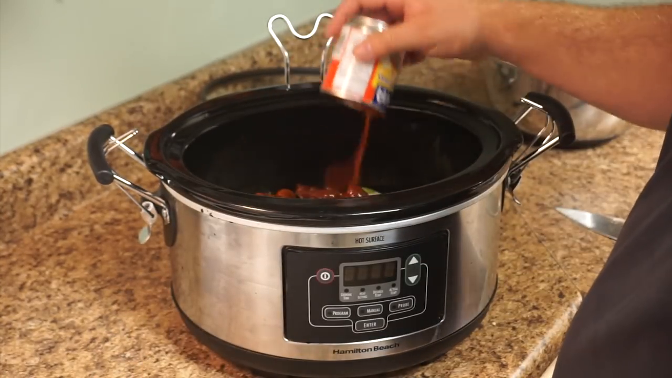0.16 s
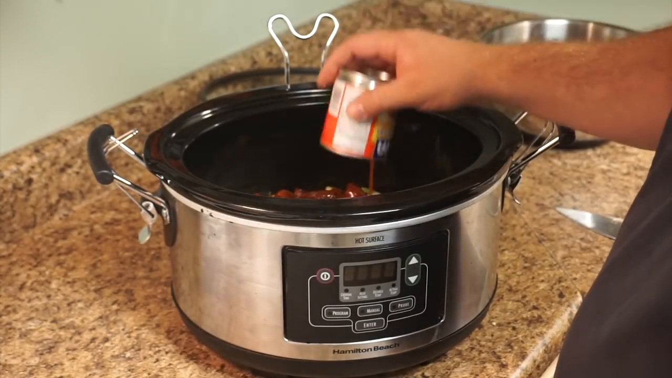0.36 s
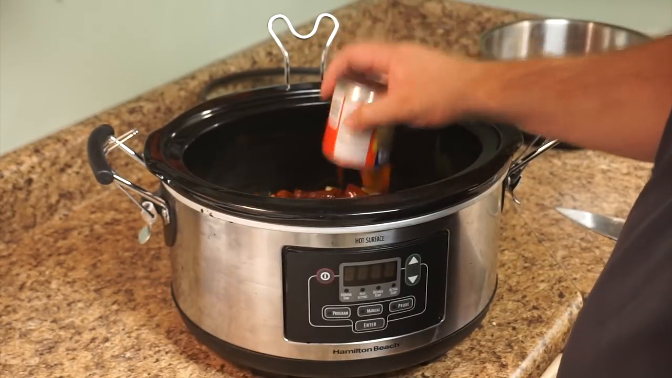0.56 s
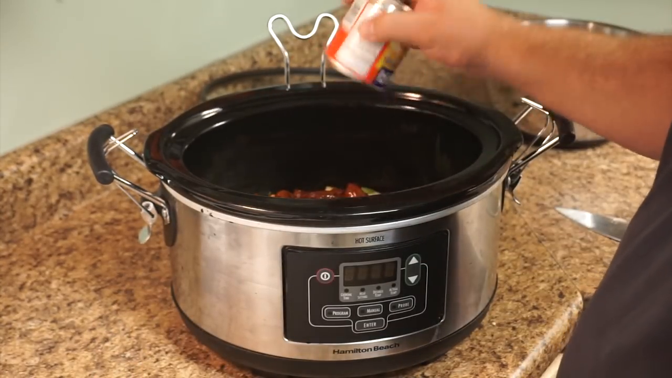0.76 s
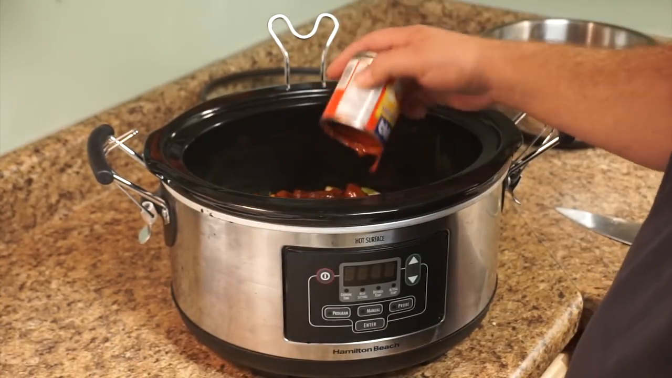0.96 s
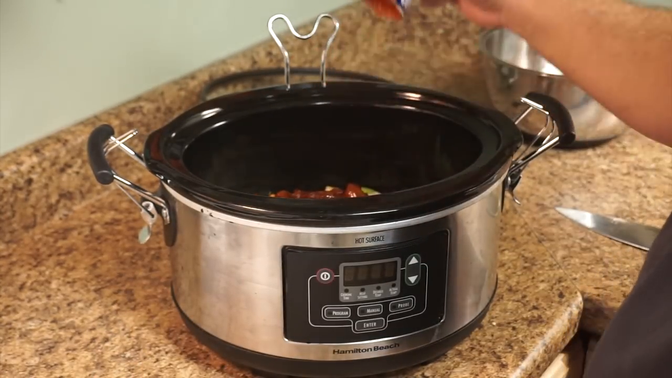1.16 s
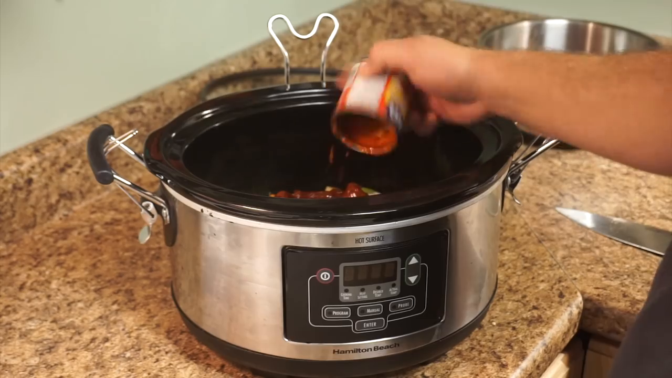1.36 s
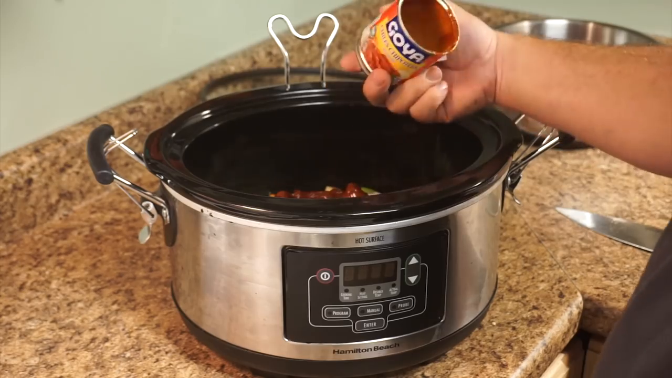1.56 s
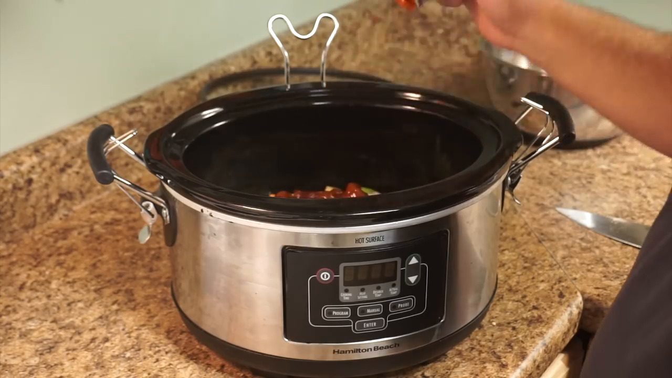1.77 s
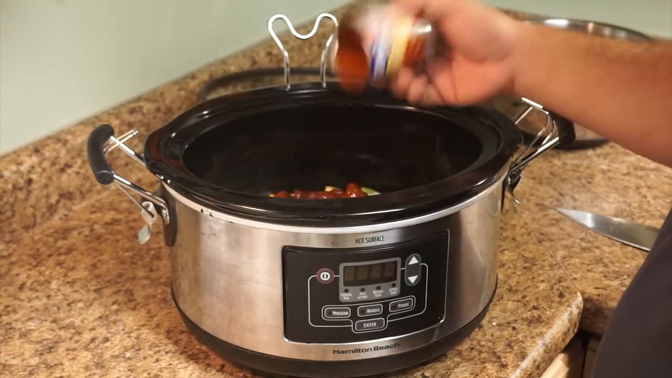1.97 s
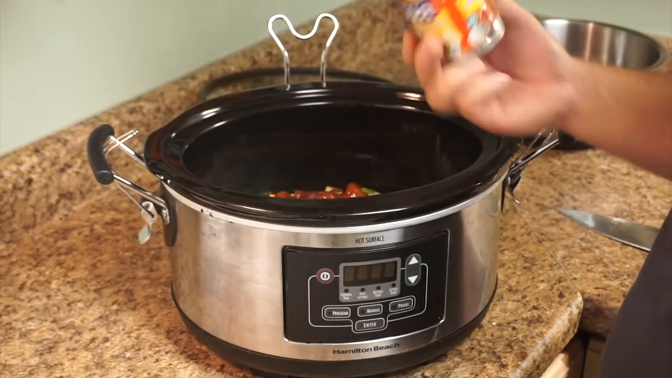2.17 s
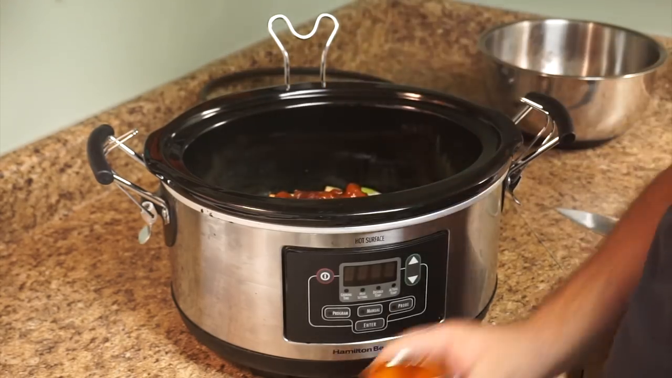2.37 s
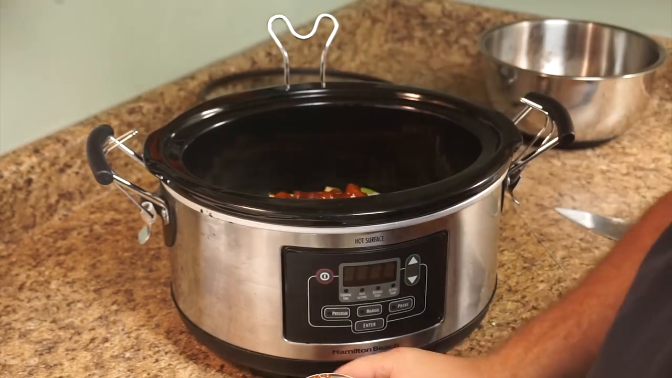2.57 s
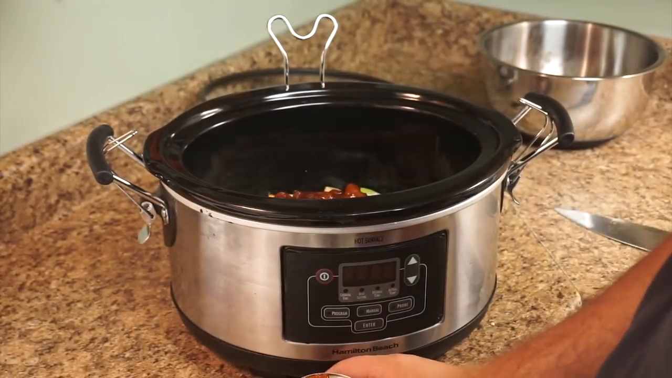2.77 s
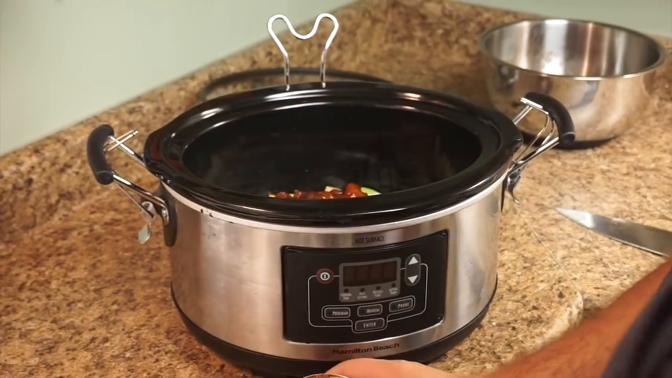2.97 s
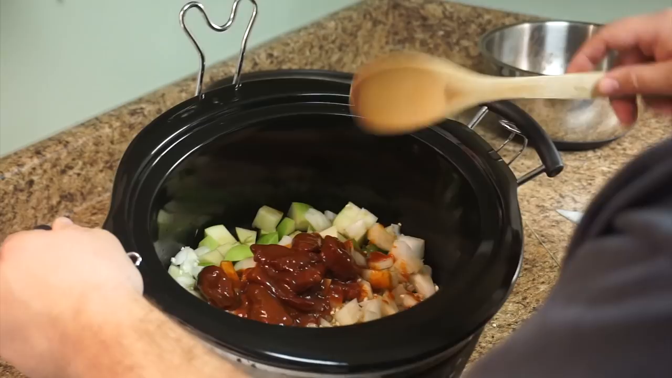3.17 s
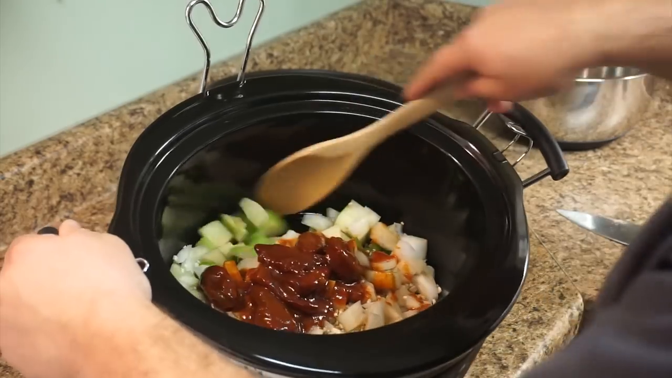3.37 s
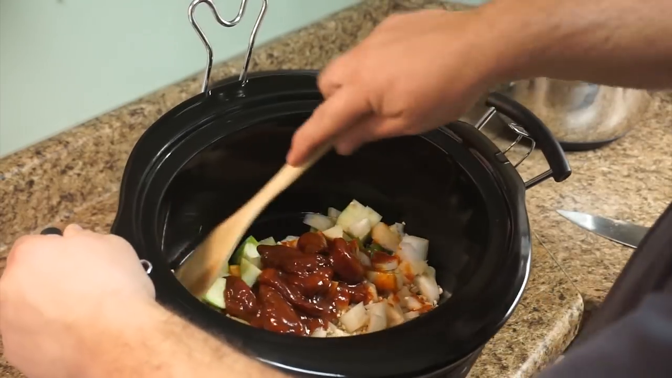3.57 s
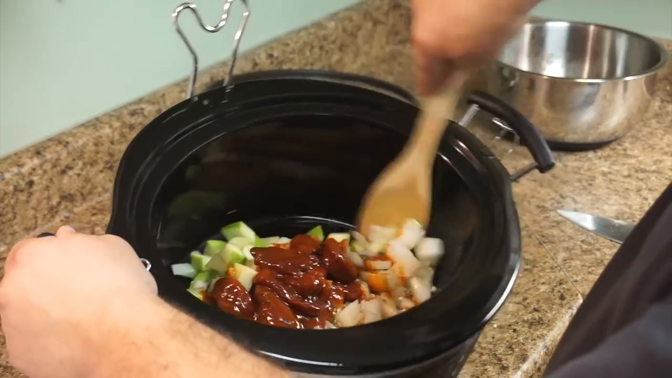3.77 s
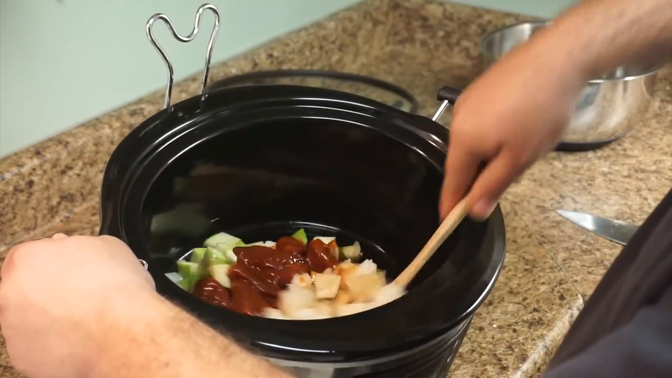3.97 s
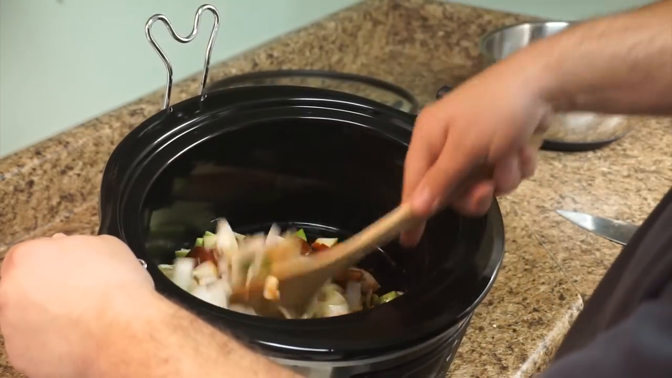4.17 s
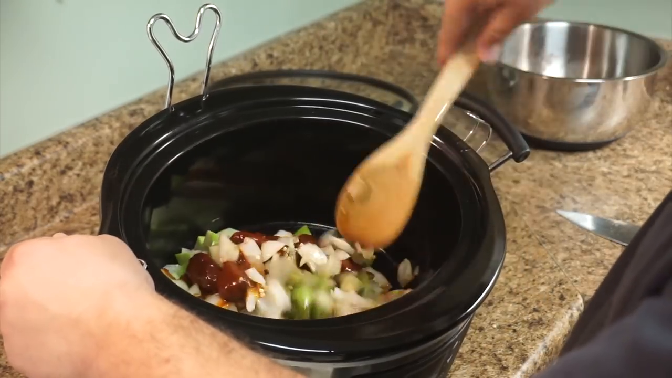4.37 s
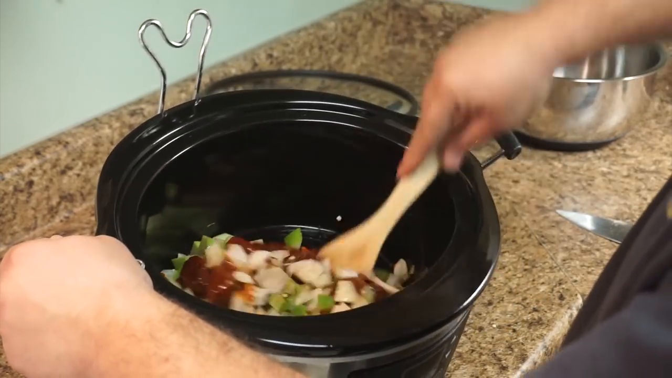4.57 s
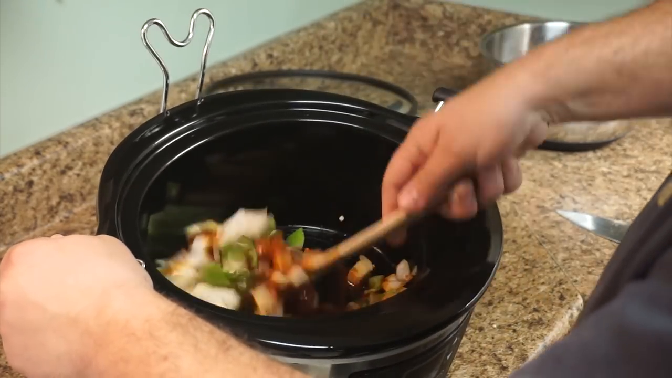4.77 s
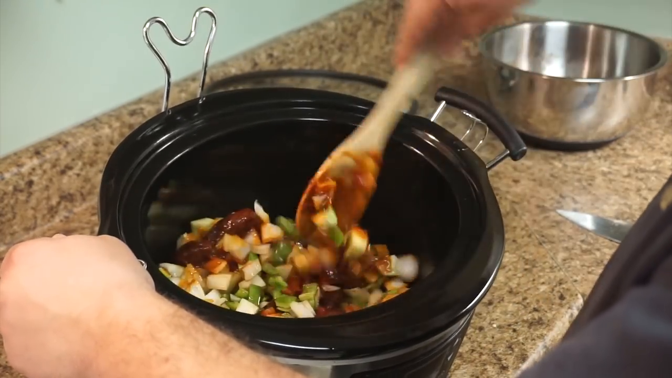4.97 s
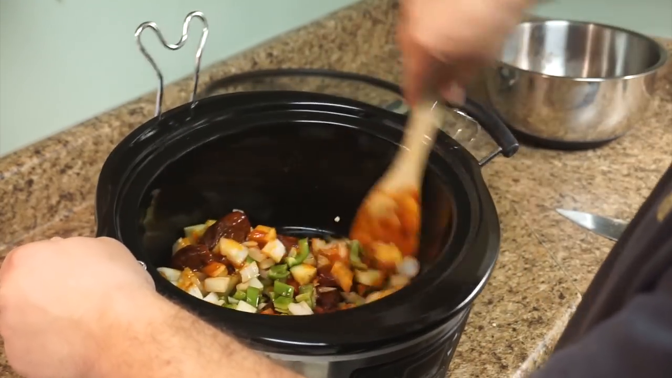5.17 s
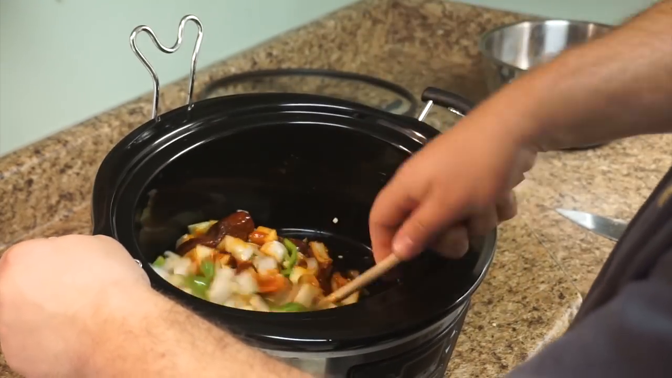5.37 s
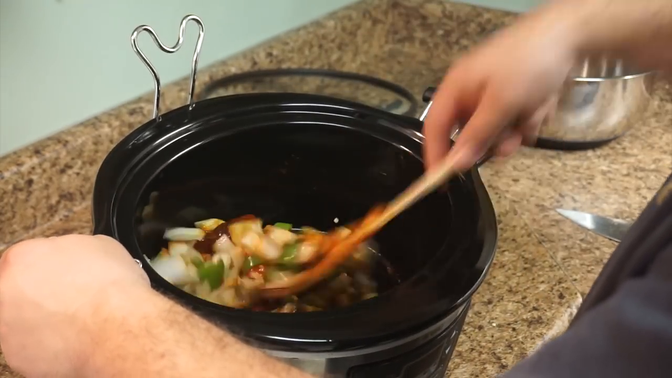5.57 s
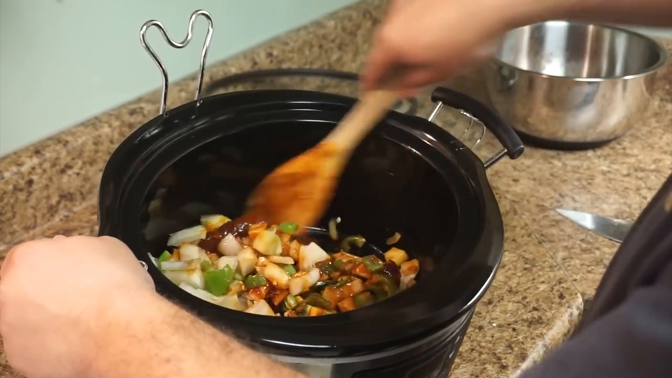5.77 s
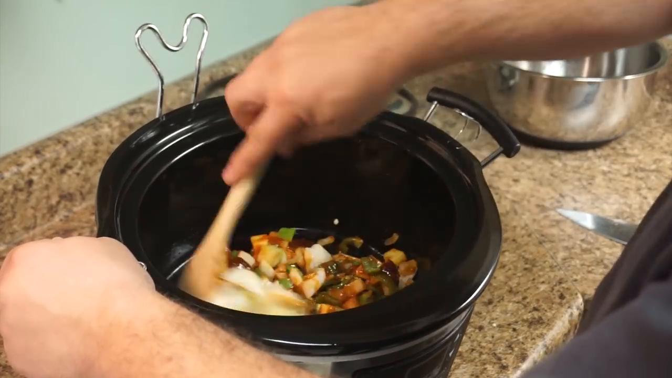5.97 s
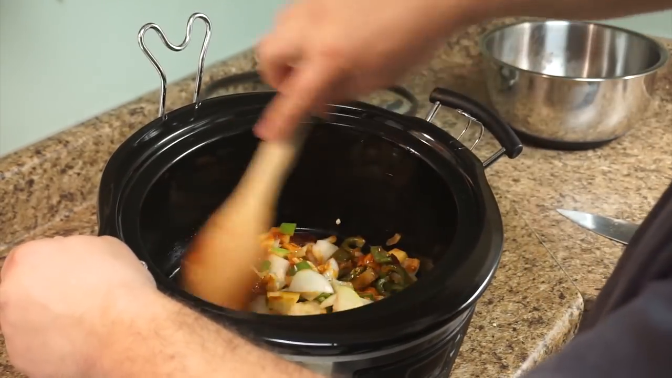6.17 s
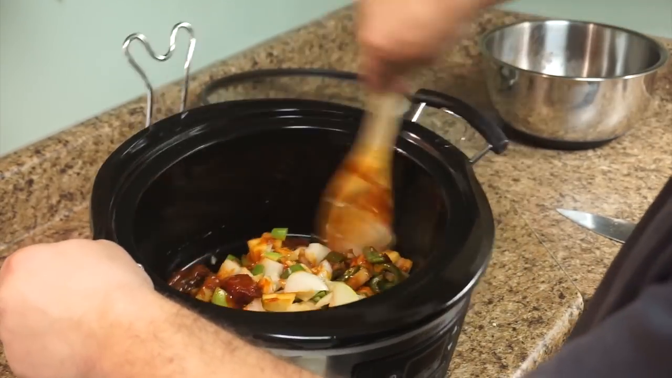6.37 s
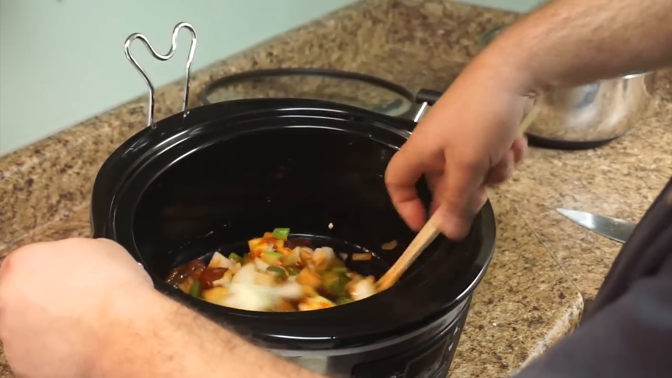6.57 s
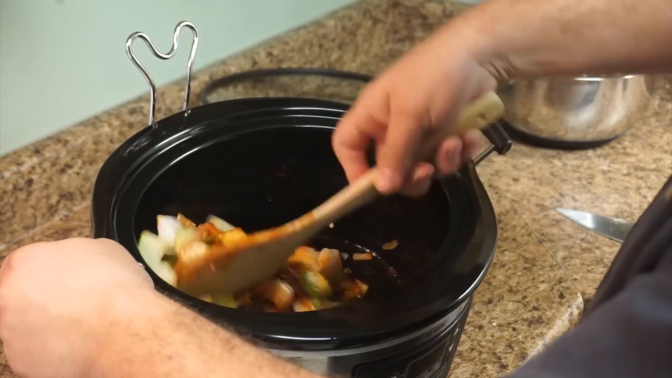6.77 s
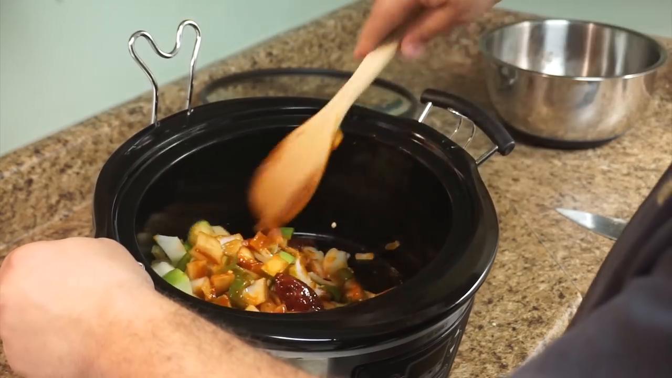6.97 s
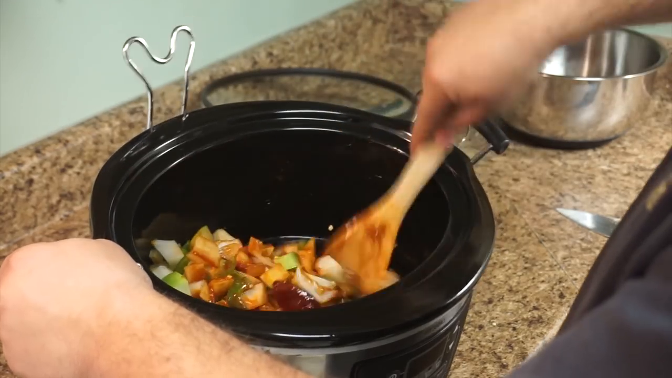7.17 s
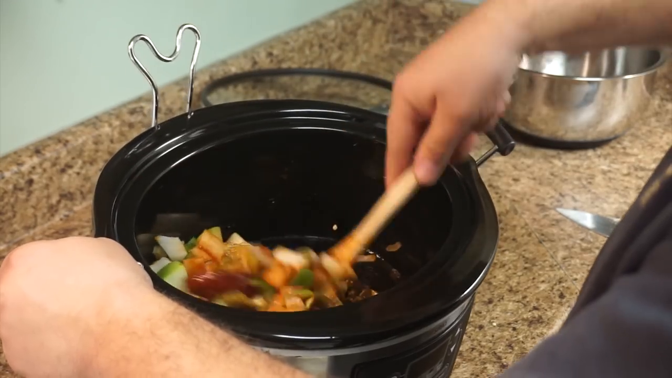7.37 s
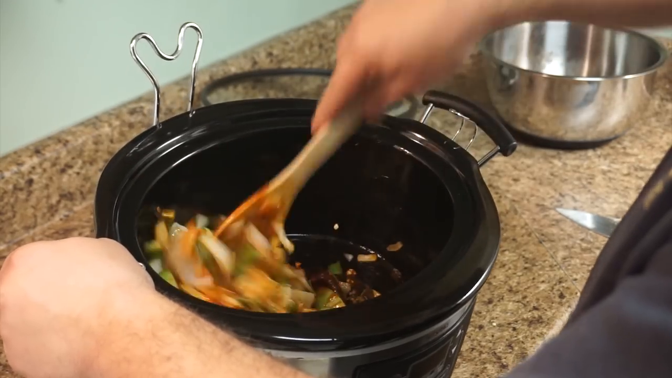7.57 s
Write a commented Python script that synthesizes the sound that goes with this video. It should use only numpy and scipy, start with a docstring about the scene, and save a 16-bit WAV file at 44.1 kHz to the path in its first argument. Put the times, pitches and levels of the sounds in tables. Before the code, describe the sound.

Quiet kitchen handling, a brief tin rattle, a short dip to silence, then brisk wooden knocks and moist stirring in a ringing ceramic pot.

```python
"""Handling rustles and a small tin lands on a stone worktop; after a short fade to silence and back
a wooden spoon knocks and scrapes in a stoneware crock of chopped vegetables. A kitchen hums behind.
Knocks are fading sine tones plus a noisy crack and a room tail; rubbing, rustling and wet sounds are
shaped noise. Appliances are sine tones over air noise, and gain control dips the loud moments."""
import sys
import numpy as np
from scipy import signal
from scipy.fft import rfft, irfft, next_fast_len
from scipy.io import wavfile
from scipy.ndimage import uniform_filter1d, minimum_filter1d, map_coordinates

SR = 44100
rng = np.random.default_rng(int(sys.argv[2]) if len(sys.argv) > 2 else 0)


def gain_from_decibels(decibels):
    """Convert decibel values to linear amplitude factors."""
    exponent = np.asarray(decibels, float) / 20
    return 10 ** exponent


def transcribe(signal):
    """Save signal, clipped to [-1, 1], as a 16-bit WAV file at the path in sys.argv[1]."""
    frames = np.atleast_2d(signal).T
    limited = np.clip(frames, -1, 1)
    pcm = np.round(limited * 32767).astype(np.int16)
    wavfile.write(sys.argv[1], SR, pcm)


N = 336483  # length in samples

# Levels in dB are relative: later steps may shift them. A t60 is the time to fall by 60 dB.
# Spoon on crock; a flat landing is broad and full, an edge tap thin. Each row: start in seconds,
# level in dB, strongest frequency in Hz, fall below it and fall above it in dB per octave.
SPOON_KNOCKS = [(3.327, -42.5, 2600, -2, 10), (3.3428, -36, 3500, 10, 18), (3.361, -25, 7400, 11.5, 8),
                (3.6662, -19.5, 2000, 4, 11), (3.8326, -28, 4400, 6, 4), (3.8529, -24, 5000, 1.5, -2.5),
                (4.351, -45, 7000, 6, -5), (4.4574, -25, 6000, 11, 2), (4.5078, -13.5, 2620, 4, 5),
                (4.6416, -34.5, 3300, 12, 6), (4.833, -44, 2500, -3, 3), (5.1119, -24, 3900, 10, 4),
                (5.1475, -15.5, 2840, 2, 4), (5.1863, -6.5, 1910, 15, 5), (5.2921, -25.5, 2200, 23, 8.5),
                (5.3058, -30.5, 4600, 4, 4), (5.5072, -41.5, 6000, 3, -4.5), (5.7415, -28, 6000, 5.5, -4),
                (5.794, -18, 4300, 6.5, 4), (5.856, -36, 11000, 2.4, 1.2), (6.0563, -28, 2080, 16, 4.5),
                (6.269, -20, 5030, 10, 7.5), (6.3057, -14.5, 940, 9, 4), (6.3223, -26.5, 7200, 7, 8),
                (6.4088, -16.5, 7060, 14, 17), (6.459, -24, 2200, 15, 20), (6.6823, -43, 5000, 2, -5),
                (7.0585, -18, 4400, 26, 13.5), (7.1359, -16.5, 3500, 1.7, 3.5), (7.216, -36, 4400, 9, 1.5),
                (7.3196, -43.5, 6000, 7, 5), (7.5, -45.5, 5000, 8, -1)]
# The crock's ringing tones. Each row: frequency in Hz, level in dB, t60 in seconds.
CROCK_MODES = [(656, -23, 0.021), (930, 5, .028), (1123, -6, 0.032), (1298, 0.5, 0.083),
               (1728, -7.5, 0.083), (2000, -3, 0.039), (2248, -2.5, 0.035), (2610, -3.5, 0.11),
               (3140, -18.5, 0.064), (3885, 9.5, 0.018), (4260, -16, 0.3), (4400, -1, 0.069),
               (4800, -0.5, 0.091), (5110, -41, 0.034), (5790, 6.5, 0.01), (5890, 10, 0.012),
               (6450, 8.5, 0.015), (7000, -28, 0.097), (8360, 1.5, 0.046), (8230, -18, 0.01),
               (10430, 9.5, 0.013), (12300, -17, 0.021)]
# The spoon's own dead, quickly fading tones. Each row: frequency in Hz, level in dB, t60 in seconds.
WOOD_MODES = [(756, -2, 0.013), (1080, 7.5, 0.013), (1346, 3, 0.0043), (2090, 12, 0.0037),
              (3130, -6, 0.018)]
# The hardest knock jolts the worktop. One row: start in seconds, frequency in Hz, level in dB, t60 in seconds.
WORKTOP_THUMP = (5.186, 55, -44, .035)
# The spoon passes through the food. Each row: peak time, rise and fall in seconds, scrape level in dB,
# wetness over the scrape in dB.
SPOON_STROKES = [(3.42, 0.079, .4, -38, 0.5), (3.59, 0.32, 0.052, -38.5, 2.5),
                 (3.665, 0.029, 0.28, -31.5, 5), (3.759, 0.027, 0.26, -23, 3),
                 (3.86, 0.16, 0.21, -22.5, -12), (4.0, .2, 0.25, -29, -2.5), (4.1, 0.038, 0.063, -33.5, 2),
                 (4.2, 0.066, 0.18, -42, -1), (4.318, 0.12, 0.07, -44, 2.5), (4.462, .004, 0.18, -29.5, 7),
                 (4.58, 0.13, 0.18, -31, -4), (4.7, 0.25, 0.094, -36, -1.5),
                 (4.84, 0.079, 0.22, -41.5, -5.5), (5.26, 0.12, 0.23, -29, 0.7), (5.4, 0.26, .06, -32, -6),
                 (5.52, 0.14, 0.16, -41, -6), (5.748, .004, 0.26, -32, 1), (5.86, 0.13, 0.25, -29, -3),
                 (5.98, .2, 0.22, -32.5, -1.7), (6.1, 0.17, 0.054, -40.5, 5.5), (6.36, 0.11, 0.9, -40, -19),
                 (6.46, 0.18, 0.14, -25.5, -15), (6.52, 0.21, .14, -32.5, -0.5),
                 (6.6, 0.17, 0.14, -31.5, -7), (6.84, 0.25, 0.094, -47.5, 4),
                 (7.065, .004, 0.15, -23.5, -2.5), (7.22, 0.18, 0.2, -35.5, -5),
                 (7.58, 0.2, 0.37, -50.5, 3.5)]
# The cook moving about. Each row: time in seconds, shuffle level in dB, scrape and hiss over the shuffle in dB.
COOK_BUSTLE = [(0, -52, 1.5, -12), (.55, -50, -1, -22), (.8, -46.5, -3.5, -26), (1.05, -46, 2, -26),
               (1.6, -47, 0, -20), (2.3, -45.5, 1.7, -14), (3.0, -46, -1.5, -8), (3.5, -48.5, 2.5, -39),
               (5.0, -45.5, 3, -6), (6.3, -47.5, 5.5, -16), (6.9, -54.5, -7, -0.5), (7.63, -53, 5.5, -5)]
# Rustle of hand, tin and cloth. Each row: peak time, rise and fall in seconds, level in dB, brightness in dB.
HAND_RUSTLES = [(1.58, 0.26, 0.091, -57, 15.5), (2.02, 0.096, 0.23, -38, -5), (2.32, 0.05, 0.23, -37, 0),
                (2.4, 0.13, 0.092, -48, 6.5), (2.58, 0.086, 0.15, -32, 5), (2.7, 0.058, 0.15, -35, -3.5),
                (2.821, .15, 0.095, -42, 9.5), (3.166, 0.042, 0.077, -26.5, 1.8)]
# Colour of the dull shuffle. Each row: frequency in Hz, level in dB.
SHUFFLE_COLOUR = [(60, -57), (250, -14), (500, -11), (1100, -6.5), (1700, -5.5), (2100, -2), (2600, -2.5),
                  (3000, -6), (5000, -25)]
# Colour of wood scraping on glaze. Each row: frequency in Hz, level in dB.
SCRAPE_COLOUR = [(200, -75), (1200, -5), (2500, -8), (3800, 1.5), (6000, -5.5), (8000, -10), (12000, -23)]
# Colour of the wet hiss. Each row: frequency in Hz, level in dB.
WET_COLOUR = [(300, -80), (3500, -11), (6000, -2), (8000, -2), (11000, -3.5), (15500, -4.5), (17000, -44)]
# Colour of the rustle's body. Each row: frequency in Hz, level in dB.
CLOTH_COLOUR = [(150, -38), (400, -9.5), (700, -8.5), (1200, 1), (1700, -1.5), (2600, -3.5), (5000, -35)]
# The spoon's edge sweeping up the wall. Each row: start and length in seconds, first and last
# frequency in Hz, level in dB.
WALL_SWEEPS = [(3.785, 0.045, 2000, 3400, -26), (6.45, .19, 2250, 3460, -31)]
# The tin's contacts with the stone. Each row: start in seconds, level in dB.
TIN_CONTACTS = [(2.5275, -6), (2.539, -8), (2.549, -8), (2.559, -23), (2.57, -33)]
# The tin's ringing tones. Each row: frequency in Hz, level in dB, t60 in seconds.
TIN_MODES = [(1123, -6.5, 0.078), (1520, -11, 0.04), (1740, -7, 0.029), (1898, 5, 0.067),
             (2060, 8.5, 0.066), (2205, 1, 0.05), (2710, -2, 0.032), (3175, 5, 0.03), (3900, -1, 0.03),
             (4680, 2, 0.043), (7000, -7, .03)]
# Fingers creasing the tin's label. Each row: start in seconds, level in dB.
LABEL_TICKS = [(0.0662, -40.5), (0.2289, -45), (0.596, -45), (0.629, -41), (1.4924, -54), (1.8986, -46)]
# Brief hollow tones. Each row: start in seconds, frequency in Hz, level in dB, length in seconds.
HOLLOW_TONES = [(2.7, 370, -47, .06), (2.815, 270, -42, .035), (3.832, 1140, -22, .028)]
# Colour of the kitchen air. Each row: frequency in Hz, level in dB.
KITCHEN_COLOUR = [(25, -52), (60, -32.5), (120, -23), (200, -14), (330, -15), (460, -4), (540, -10),
                  (670, -1.5), (790, -20), (900, -3.5), (1300, -13), (1710, -4), (2100, -27), (2540, -9),
                  (3100, -62), (8000, -44), (16000, -51)]
# Loudness of the kitchen air. Each row: time in seconds, level in dB.
AIR_LEVEL = [(0, -52), (2.2, -54), (2.8, -49.5), (3.0, -52.5), (3.5, -51), (4.5, -53.5), (6.5, -49.5),
             (7.63, -53.5)]
# Appliance hum and whine. Each row: frequency in Hz, level in dB.
APPLIANCE_HUM = [(240, -60), (8200, -68)]
# Likeness of left and right. Each row: frequency in Hz, likeness from 0 to 1.
LEFT_RIGHT_LIKENESS = [(30, 0.99), (150, 0.92), (600, 0.93), (1500, 0.76), (4000, 0.56), (12000, 0.25)]
# How fast the room's tail dies. Each row: frequency in Hz, t60 in seconds.
ROOM_DECAY = [(300, 0.24), (1500, 0.16), (5000, 0.17), (14000, 0.21)]
# The microphone's tone. Each row: frequency in Hz, gain in dB.
MICROPHONE_TONE = [(60, 6), (300, -3), (600, 3.5), (15700, -2.5), (16000, -35)]

SOFT_BELOW_DB, HARD_ATTACK_S = -29, 0.0002  # weaker knocks start more slowly
SKID_S, SKID_GROWS = 0.048, 0.61  # t60 of the crack's slow part for a 4000 Hz knock, growth power with pitch
DRIER_DB_PER_OCTAVE = 3.5  # low knocks land deep in the food and carry less into the room
FOOD_DB = -9  # dull tumble of the pieces under the scrape
RUSTLE_HISS_DB = -11.5  # hiss under the rustle's bright part
SWEEP_ATTACK_S, SWEEP_SAG_DB = 0.015, 6  # fade at each end, loss over the sweep
FADE_OUT_S, DARK_S, FADE_IN_S, FADE_BEND = 0.032, 3.241, 0.125, 2.1  # DARK_S is the silent moment


def unit(x):
    """Scale to an rms of 1."""
    return x / np.sqrt(np.mean(x ** 2) + 1e-20)


def along(points, hz):
    """Read a curve of (Hz, value) points on a log frequency axis."""
    f, v = np.transpose(points)
    return np.interp(np.log(hz + 1), np.log(f + 1), v)


def curves(rows):
    """Give one value per sample for each column after the time."""
    s, *cols = np.transpose(rows)
    return [np.interp(np.arange(N) / SR, s, c) for c in cols]


def wobble(rate):
    """Draw a random curve with rate knots a second."""
    knots = rng.standard_normal(int(N * rate / SR) + 4)
    return map_coordinates(knots, [np.arange(N) * rate / SR], order=1)


def swell(s, rise_s, fall_s):
    """Power of a sound that climbs 20 dB in rise_s and sinks 20 dB in fall_s."""
    t = np.arange(N) / SR - s
    return gain_from_decibels(-40 * np.where(t < 0, -t / rise_s, t / fall_s))


def filtered(x, response):
    """Multiply the spectrum of x by a response of frequency."""
    n = x.shape[-1]
    m = next_fast_len(n + 2048)
    return irfft(rfft(x, m) * response(np.fft.rfftfreq(m, 1 / SR)), m)[..., :n]


def spread(pair, spectrum=((1000, 0),)):
    """Colour two unrelated signals and mix them to the left-right likeness of the microphones."""
    def turn(hz):
        return np.arccos(np.clip(along(LEFT_RIGHT_LIKENESS, hz), -1, 1)) / 2

    def response(hz):
        return gain_from_decibels(along(spectrum, hz)) * [np.cos(turn(hz)), np.sin(turn(hz))]

    mid, side = filtered(pair, response)
    return np.array([mid + side, mid - side])


def rush(spectrum, patchy_db, grain_db):
    """Make stereo noise of rms 1 with patches of random gain and millisecond grains."""
    z = signal.stft(rng.standard_normal((2, N)), nperseg=512)[2]
    field = uniform_filter1d(rng.standard_normal(z.shape[1:]), size=8, axis=0)
    field = uniform_filter1d(field, size=6, axis=1)
    pair = signal.istft(z * gain_from_decibels(patchy_db * unit(field)), nperseg=512)[1][:, :N]
    pair = pair * gain_from_decibels(grain_db * wobble(300))
    return unit(spread(pair, spectrum))


def room(x):
    """Add a fresh stereo tail of noise in which each frequency dies at its own speed."""
    hz, t, z = signal.stft(rng.standard_normal((2, len(x))), SR, nperseg=128)
    decay = gain_from_decibels(-60 * t / along(ROOM_DECAY, hz)[:, None])
    tail = spread(signal.istft(z * decay, SR, nperseg=128)[1])
    return signal.fftconvolve(x[None], tail / np.linalg.norm(tail[0]), axes=1)[:, :len(x)]


def blow(modes, colour, attack_s, scatter_db, rough, crack_db, crack_s, wet_db, pan_db):
    """One contact: fading tones roughened by chatter, a noisy crack, and the room's answer."""
    t = np.arange(SR // 20) / SR
    hz, db, t60 = np.transpose(modes)[:, :, None]
    level = db + along(colour, hz) + scatter_db * rng.standard_normal(hz.shape)
    drift = rough * np.cumsum(rng.standard_normal((len(hz), len(t))), axis=1)
    ring = np.sum(gain_from_decibels(level - 60 * t / t60) * np.sin(2 * np.pi * hz * t + drift), axis=0)
    # the crack thins out in the treble
    tilted = [(f, gain_db - 2.0 * np.log2(f / 4000)) for f, gain_db in colour]
    decay = gain_from_decibels(-60 * t / crack_s) + 1.08 * gain_from_decibels(-60 * t / 0.0039)
    crack = gain_from_decibels(crack_db) * decay * spread(rng.standard_normal((2, len(t))), tilted)
    dry = (ring + crack) * (1 - np.exp(-t / attack_s))
    dry = np.pad(dry, ((0, 0), (0, SR // 7)))  # space for the tail
    dry = filtered(dry, lambda f: (1j * f / (560 + 1j * f)) ** 4)  # a small contact has no bass
    return dry * gain_from_decibels([[pan_db / 2], [-pan_db / 2]]) + gain_from_decibels(wet_db) * room(dry[0])


def add(track, s, sound):
    """Mix a sound in at time s."""
    part = track[:, round(s * SR):][:, :sound.shape[1]]
    part += sound[:, :part.shape[1]]


def spoon():
    """Knocks ring the same crock and spoon, coloured by the spot the wood strikes; weak ones land softly."""
    out = np.zeros((2, N))
    for s, db, hz, below, above in SPOON_KNOCKS:
        # the colour falls for five octaves on each side of the strongest frequency
        colour = [(hz / 2 ** 5, db - 5 * below), (hz, db), (hz * 2 ** 5, db - 5 * above)]
        attack_s = HARD_ATTACK_S * gain_from_decibels(1.9 * max(SOFT_BELOW_DB - db, 0))
        skid_s = SKID_S * (hz / 4000) ** SKID_GROWS
        wet_db = 5.0 + DRIER_DB_PER_OCTAVE * np.log2(hz / 4000)
        knock = blow(CROCK_MODES + WOOD_MODES, colour, attack_s, scatter_db=0.0, rough=0.13,
                     crack_db=11, crack_s=skid_s, wet_db=wet_db, pan_db=-0.4)
        add(out, s, knock)
    s, hz, db, t60 = WORKTOP_THUMP
    t = np.arange(SR // 5) / SR
    thump = gain_from_decibels(db - 60 * t / t60) * np.sin(2 * np.pi * hz * t)
    add(out, s, thump[None])
    return gain_from_decibels(1.5) * out


def motion():
    """Shuffling, rustling, wood scraping on glaze and crackling wet sauce: noises the hand jerks along."""
    base_db, scrape_db, hiss_db = curves(COOK_BUSTLE)
    # three rows of power: dull shuffle, hard scrape, moist hiss
    power = gain_from_decibels(2 * (base_db + np.array([0 * base_db, scrape_db, hiss_db])))
    body = np.zeros(N)
    for s, rise_s, fall_s, db, bright_db in HAND_RUSTLES:
        shape = gain_from_decibels(2 * db) * swell(s, rise_s, fall_s)
        body += shape
        power[1:] += gain_from_decibels(2 * np.array([[bright_db], [bright_db + RUSTLE_HISS_DB]])) * shape
    for s, rise_s, fall_s, db, wet_db in SPOON_STROKES:
        levels = db + np.array([[FOOD_DB], [0], [wet_db]])
        power += gain_from_decibels(2 * levels) * swell(s, rise_s, fall_s)
    dull, hard, moist = np.sqrt(power)
    jerk = wobble(30)
    shuffle = dull * gain_from_decibels(0.5) * rush(SHUFFLE_COLOUR, patchy_db=1.5, grain_db=0.0)
    scrape = hard * gain_from_decibels(-4.5 + 1.5 * jerk) * rush(SCRAPE_COLOUR, patchy_db=0.5, grain_db=1.0)
    wet = moist * gain_from_decibels(2.5 + 2.2 * jerk) * rush(WET_COLOUR, patchy_db=2.2, grain_db=3.2)
    rustle = np.sqrt(body) * gain_from_decibels(0.66 * jerk) * rush(CLOTH_COLOUR, patchy_db=3.0, grain_db=1.0)
    return shuffle + scrape + wet + rustle


def swish():
    """The spoon's edge on the wall: grainy friction noise in one broad rising resonance."""
    grit = rng.standard_normal((2, N)) * gain_from_decibels(3.2 * wobble(180) + 2.5 * wobble(40))
    hz, t, z = signal.stft(grit, SR, nperseg=256)
    path = []
    gain = np.zeros(N)
    now = np.arange(N) / SR
    for s, length, from_hz, to_hz, db in WALL_SWEEPS:
        path += [(s, from_hz), (s + length, to_hz)]
        sag = SWEEP_SAG_DB * np.clip((now - s) / length, 0, 1)
        edges = np.clip(np.minimum(now - s, s + length - now) / SWEEP_ATTACK_S, 0, 1)
        gain += gain_from_decibels(db - sag) * edges
    s, centre = np.transpose(path)
    away = np.log((hz[:, None] + 1) / np.interp(t, s, centre))  # distance from the resonance
    peak = 1 / (1 + (away / 0.27) ** 4)
    friction = signal.istft(z * peak, SR, nperseg=256)[1][:, :N]
    return gain * unit(spread(friction))


def tin():
    """The empty tin meets the stone and rocks: each contact rings its tones at new strengths."""
    out = np.zeros((2, N))
    for s, db in TIN_CONTACTS:
        contact = blow(TIN_MODES, [(2000, -4.0), (9000, -6.5)], 0.0016, scatter_db=2.5, rough=0.14,
                       crack_db=-15, crack_s=0.013, wet_db=4.5, pan_db=-3.0)
        add(out, s, gain_from_decibels(db) * contact)
    return gain_from_decibels(-6) * out


def ticks():
    """Tiny bright snaps of fading treble noise, and short hollow sine tones with a room tail."""
    out, t = np.zeros((2, N)), np.arange(SR // 10) / SR
    for s, db in LABEL_TICKS:
        burst = gain_from_decibels(-60 * t / 0.049) * rng.standard_normal(len(t))
        snap = filtered(burst, lambda f: (1j * f / (7000 + 1j * f)) ** 3)  # keeps the treble
        add(out, s, gain_from_decibels(db + 4.5) * snap[None])
    for s, hz, db, length in HOLLOW_TONES:
        arch = np.sqrt(np.sin(np.pi * np.clip(t / length, 0, 1)).clip(0))
        tone = np.sin(2 * np.pi * hz * t) * arch
        add(out, s, gain_from_decibels(db) * (tone + gain_from_decibels(-11) * room(tone)))
    return out


def kitchen():
    """Air noise of the room and the slightly unsteady hum and whine of appliances."""
    t = np.arange(N) / SR
    hum = np.zeros(N)
    for hz, db in APPLIANCE_HUM:
        hum += gain_from_decibels(db + 0.65 * wobble(34)) * np.sin(2 * np.pi * hz * t + 0.15 * wobble(6.5))
    air = gain_from_decibels(curves(AIR_LEVEL)[0]) * rush(KITCHEN_COLOUR, patchy_db=-0.8, grain_db=3.4)
    return air + hum


def scene():
    """Sum all sources."""
    return spoon() + motion() + swish() + tin() + ticks() + kitchen()


def low_pass(x):
    """Removes everything above the highest recorded frequency."""
    return signal.sosfilt(signal.butter(12, 16840, fs=SR, output="sos"), x)


def record(dry):
    """Gain control pulls loud moments down within milliseconds, then lets go; a fade dips to silence and back."""
    balanced = dry * gain_from_decibels([[0.4], [-0.4]])  # left a little louder
    heard = filtered(balanced, lambda hz: gain_from_decibels(along(MICROPHONE_TONE, hz)))
    level_db = 20 * np.log10(np.abs(heard).max(axis=0) + 1e-9)
    over = np.maximum(level_db + 26, 0)  # dB above the -26 dB threshold
    held = -minimum_filter1d(-over, size=1101, origin=550)  # peaks are held for 25 ms
    duck = 0.5 * signal.lfilter([0.003], [1, 0.003 - 1], held)  # smoothed; half the excess, in dB
    t = np.arange(N) / SR - DARK_S
    fade = np.where(t < 0, -t / FADE_OUT_S, t / FADE_IN_S).clip(0, 1) ** FADE_BEND
    return low_pass(heard * fade * gain_from_decibels(-duck))


dry = scene()
out = record(dry)
transcribe(out)
```